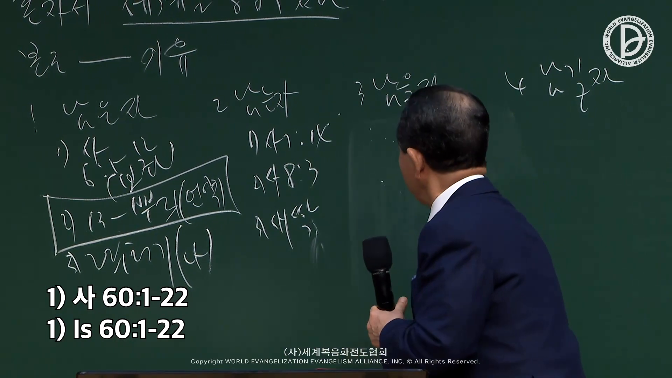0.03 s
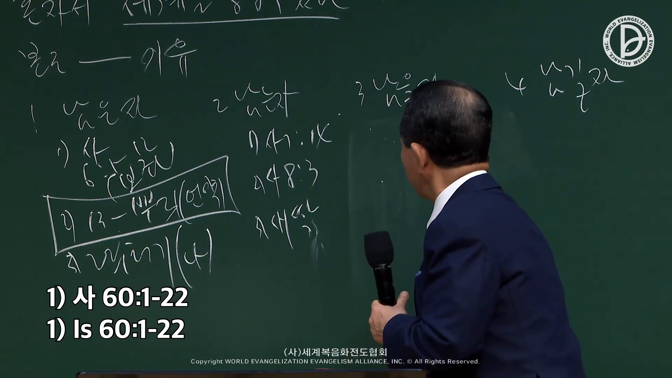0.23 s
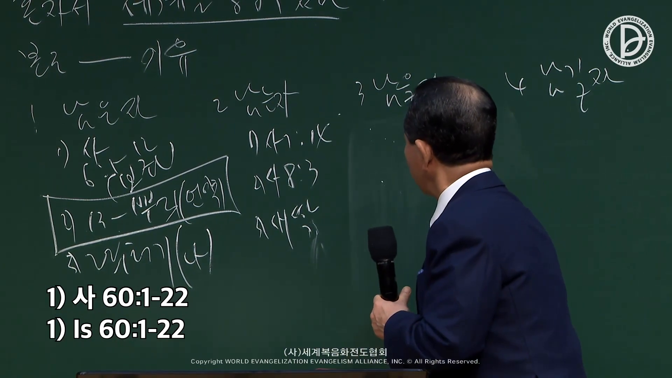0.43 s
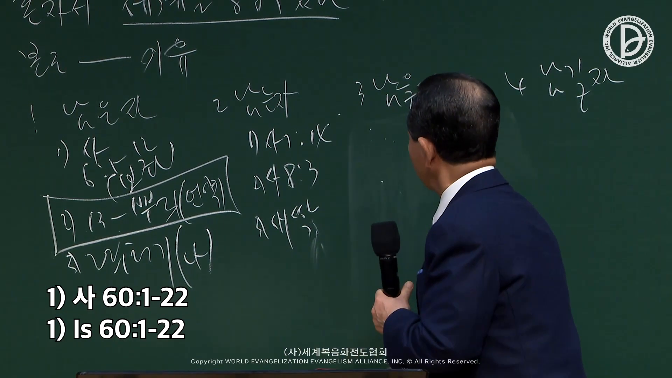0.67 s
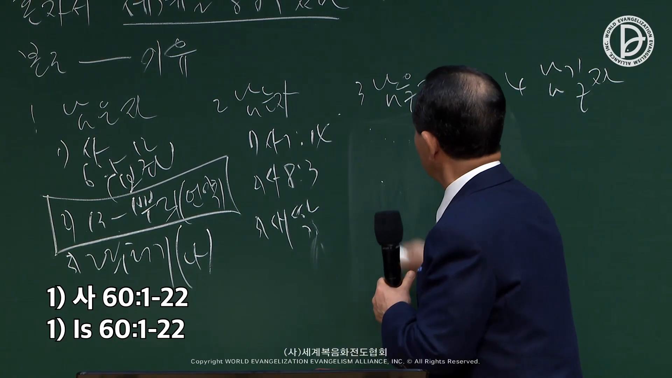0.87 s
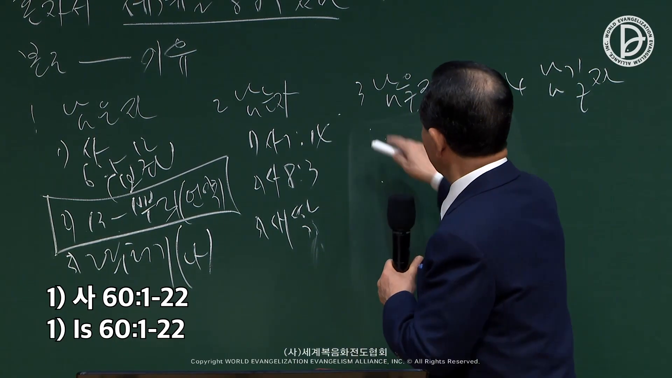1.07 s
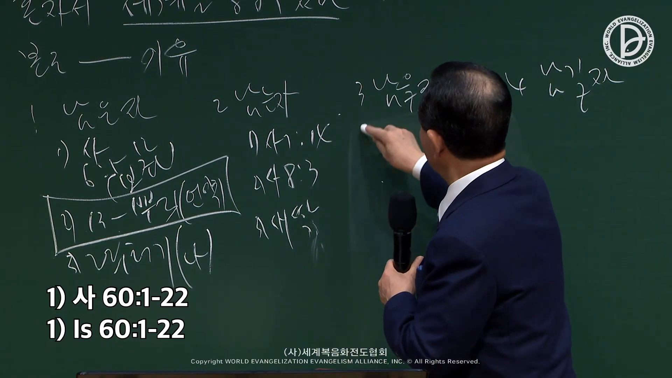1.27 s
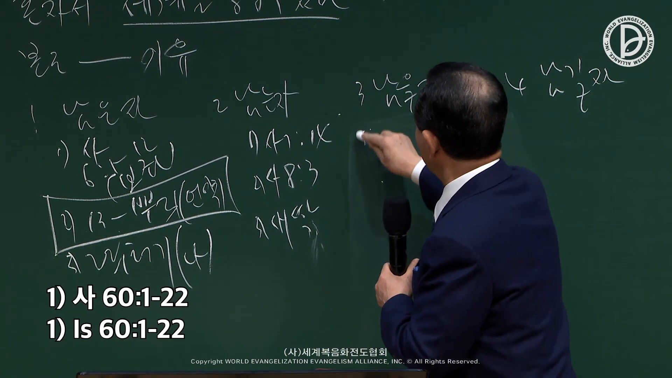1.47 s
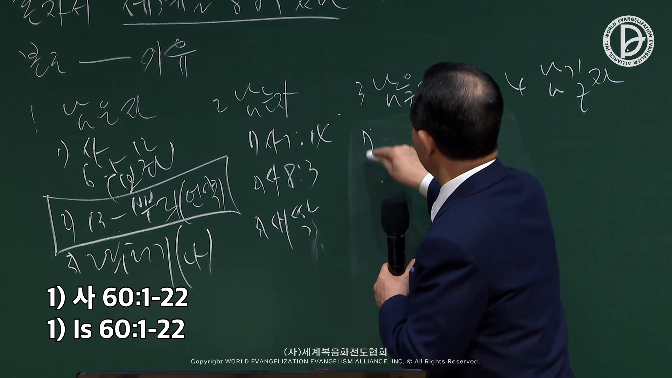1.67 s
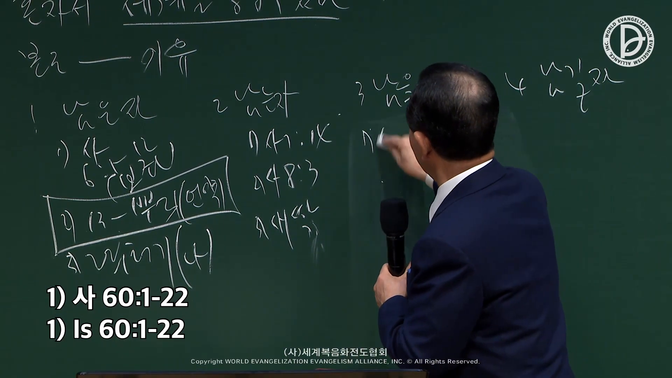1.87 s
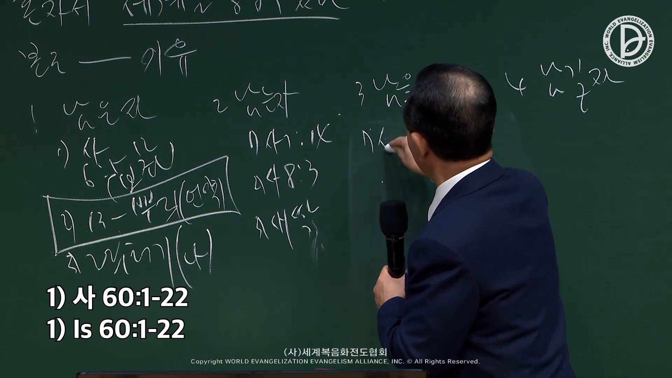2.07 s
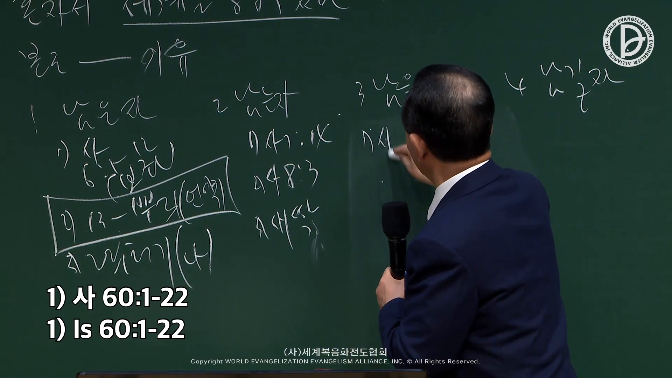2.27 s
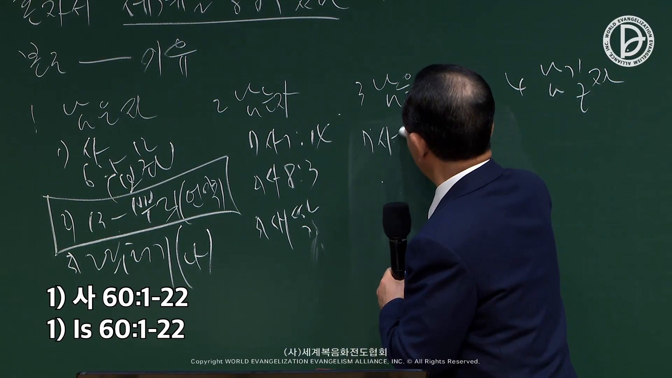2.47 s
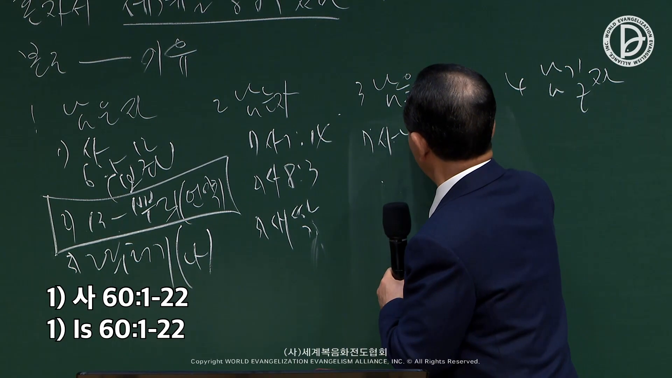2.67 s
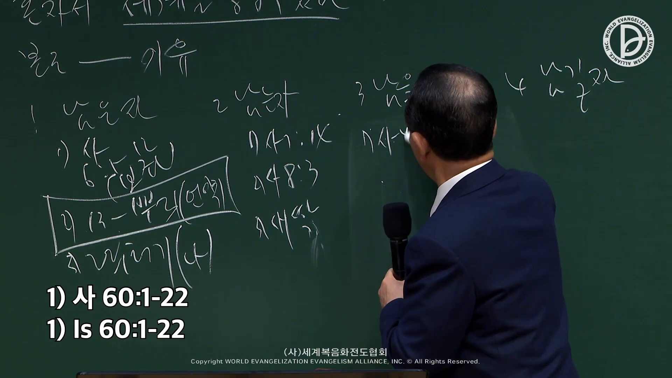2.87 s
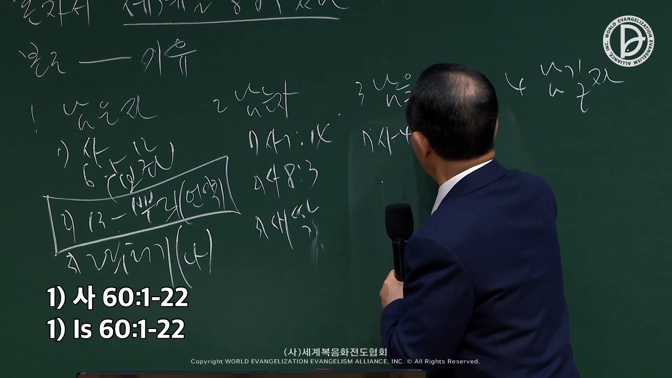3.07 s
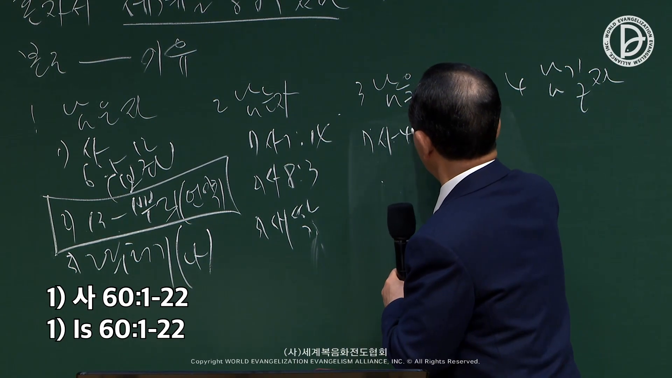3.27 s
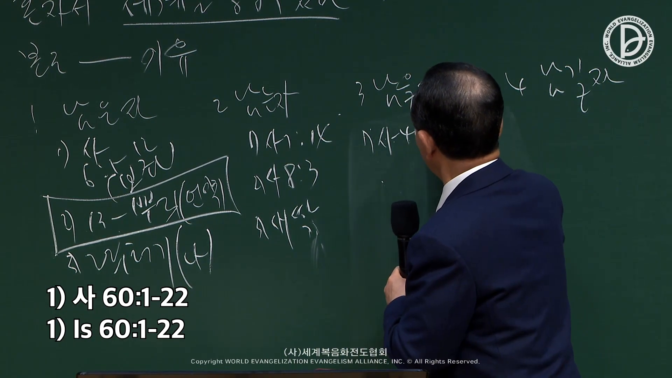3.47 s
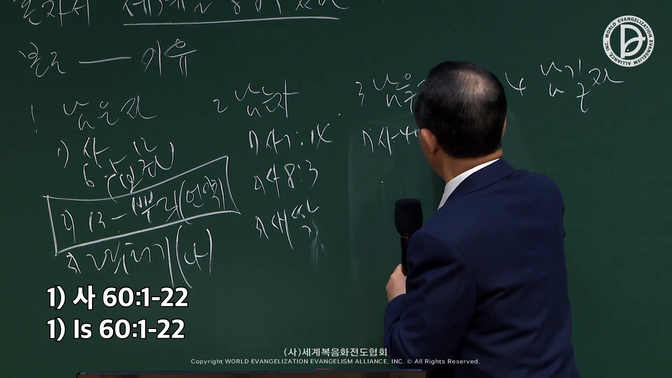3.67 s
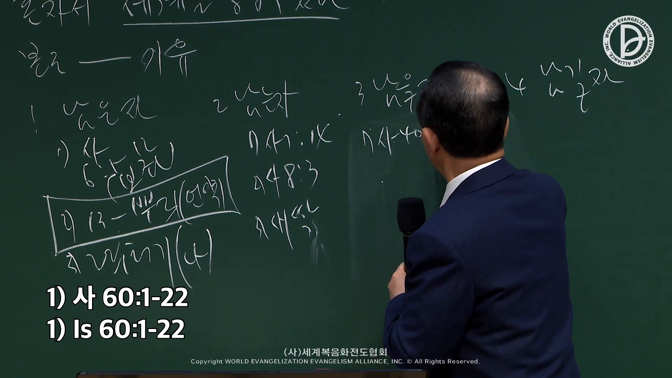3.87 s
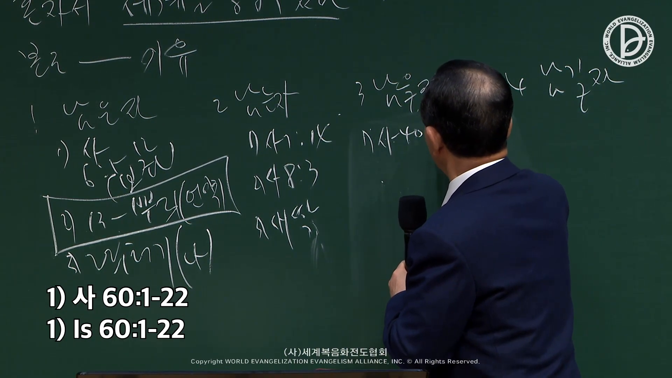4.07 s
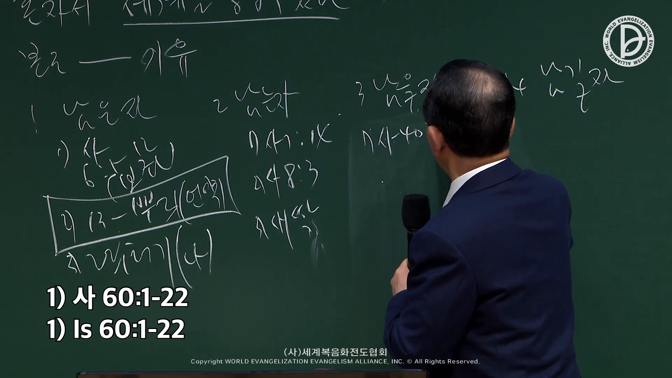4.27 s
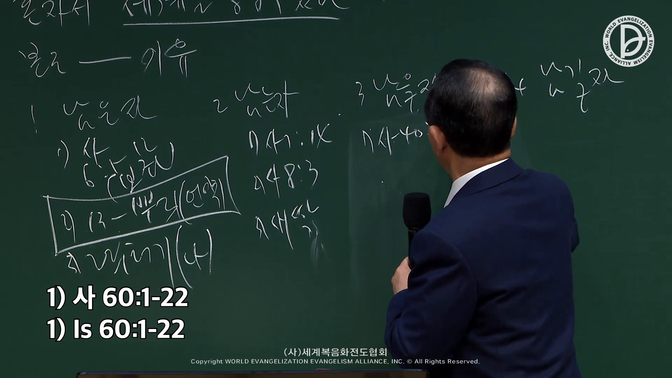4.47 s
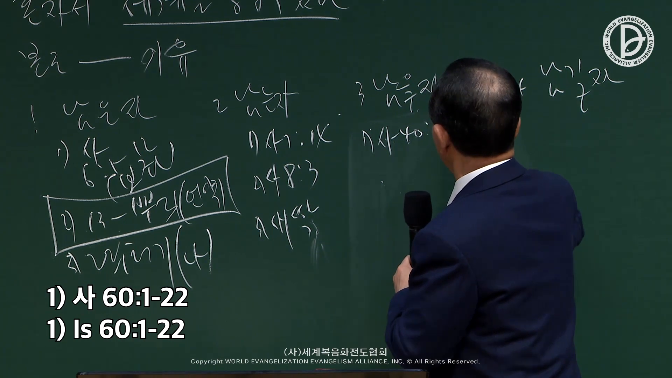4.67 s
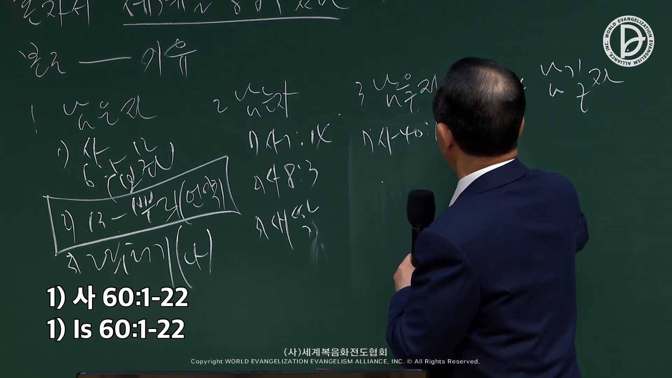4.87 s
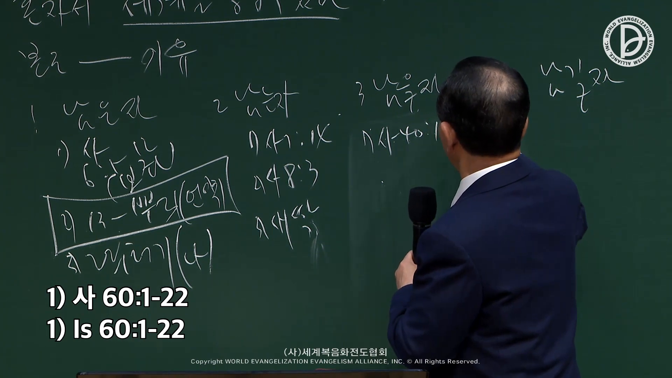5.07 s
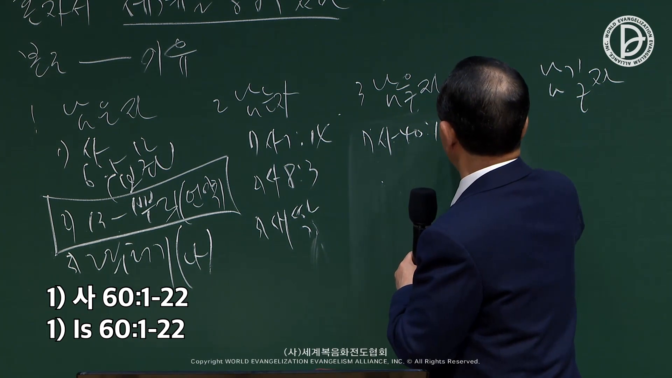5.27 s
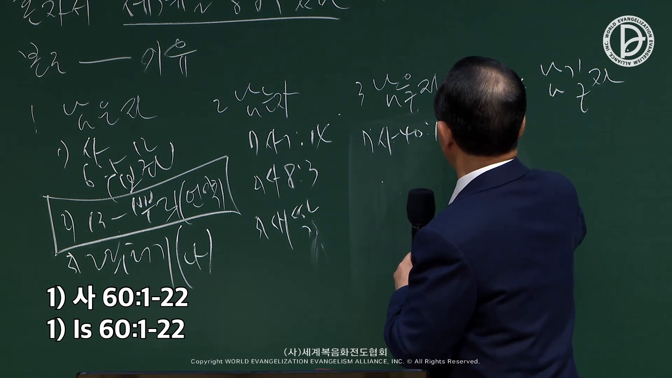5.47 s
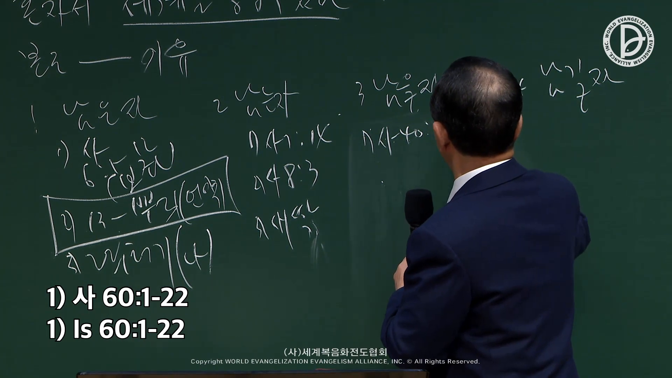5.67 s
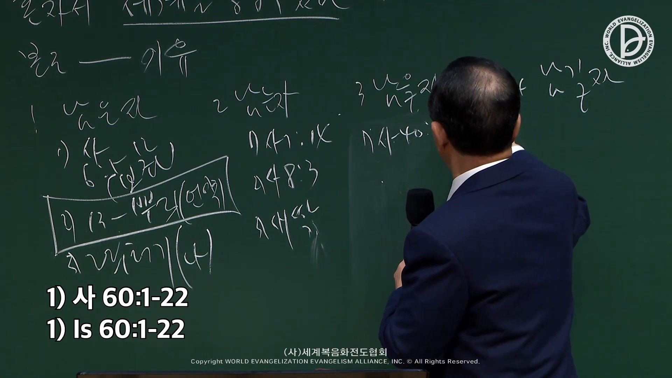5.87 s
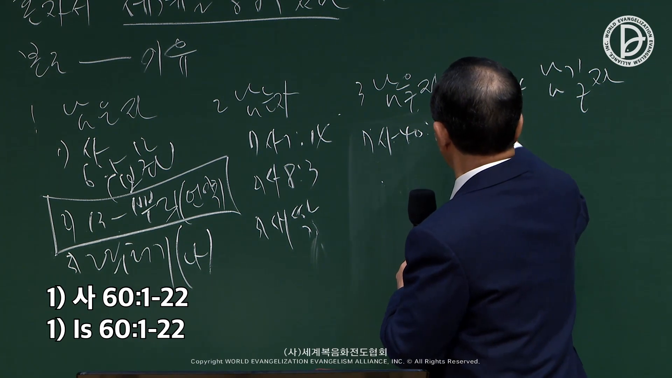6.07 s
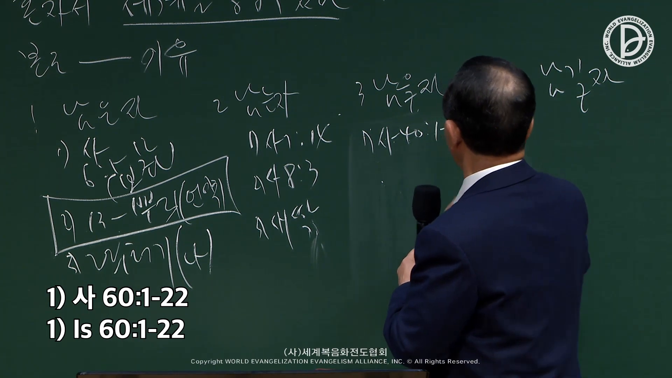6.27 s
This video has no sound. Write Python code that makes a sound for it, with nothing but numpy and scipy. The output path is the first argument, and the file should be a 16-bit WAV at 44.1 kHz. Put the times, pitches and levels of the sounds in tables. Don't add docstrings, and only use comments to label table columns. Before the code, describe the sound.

For the first 1.3 seconds there is only faint, steady ventilation and amplifier hiss, slight cloth rustle and a few very soft low knocks. At 1.3 s chalk hits the blackboard with a firm, hollow clack, and a quick uneven run follows, about every 0.2 to 0.3 s until 3.1 s, with stronger hits near 1.85, 2.85 and 3.05. Short gritty scrapes link them. Each hit is close and dry, then slaps back about 30 ms later from the hall loudspeakers with a brief bright tail. From 3.4 to 4.6 s the strikes are wider apart, duller in body, with light tip ticks and soft brushing around 3.7 to 4.05. A muffled sleeve bump comes at 4.77. Weaker taps fall at 5.3 and 5.86, with a faint fluttering chatter between from 5.6. Soft touches, low knocks and brushing close around 6.1 to 6.2 s over the hiss.

```python
import sys
import numpy as np
from scipy import signal
from scipy.fft import rfft, irfft
from scipy.io import wavfile

SR = 44100
rng = np.random.default_rng(int(sys.argv[2]) if len(sys.argv) > 2 else 0)


def store_wav(level_fs):
    pcm = np.round(np.clip(np.atleast_2d(level_fs), -1, 1) * 32767)
    wavfile.write(sys.argv[1], SR, pcm.T.astype(np.int16))


def attenuation_scalar(level_db):
    decades = np.asarray(level_db, float) / 20
    return 10 ** decades


N = 278800

# frequency in Hz, density in dB per Hz.
AIR_SPECTRUM = [(35, -67.5), (72, -6), (105, 7), (150, 1.5), (246, 0), (334, -9.5), (375, -1), (573, -7.5),
                (629, -5), (895, -5.5), (3840, -11.5), (5100, -13.5), (15400, -10.5), (16500, -18.5)]
# frequency in Hz, level in dB rms.
WHINES = [(371, -88), (3840, -87), (7531, -84), (15682, -95)]
# peak time in seconds, level in dB, swell and fade in seconds per 20 dB.
BUMPS = [(.306, -71.5, 0.45, 0.2), (.9, -85, 1.9, 5), (4.766, -48.5, 0.24, 0.15), (5.144, -73, 0.22, 0.1),
         (5.32, -56.5, 0.22, 0.03), (5.888, -64, 0.087, 0.43), (6.196, -70.5, .8, .09)]
# frequency in Hz, density in dB per Hz.
BUMP_SPECTRUM = [(53, -58), (90, -46), (157, 5), (271, 4), (416, 10), (1070, 2), (1500, -22.5), (2000, -9),
                 (2600, -52), (4400, -120)]
# start in seconds, peak in dB, frequency in Hz.
KNOCKS = [(0.144, -62, 133), (.205, -56, 553), (0.773, -70, 172), (.78, -67, 403), (0.902, -67, 124),
          (4.765, -46, 160), (4.859, -52.5, 200), (5.154, -58, 433), (6.05, -52, 442), (6.082, -59, 69),
          (6.123, -68, 69)]
# frequency in Hz, level in dB, decay time t60 in seconds.
HALL = [(100, -16, 0.4), (170, -3, 0.55), (300, -6.5, 0.96), (700, -9, 0.52), (1547, 9, 0.61),
        (2500, 9, 0.47), (4000, 6, 0.43), (7300, 13, 0.26), (12200, 9, 0.22)]
# delay in seconds, level in dB.
ECHOES = [(.0027, -19), (.0066, -20), (0.0283, -22.5), (0.032, -13), (0.0364, -27.5), (.0401, -23.5),
          (0.0406, -19.5)]
# start in seconds, board thud in dB, then knock, tick and chalk ring in dB
LANDINGS = [(1.31, -17.5, -2.5, -14.5, -28), (1.5277, -20, 3.5, -4, -18), (1.8451, -13.5, 2.1, 1, -7.5),
            (2.0177, -18, 0.6, -5, -10.5), (2.1984, -17.5, 3, -2.5, -20.5), (2.4095, -18.5, 1, -5.5, -13.5),
            (2.5801, -19.5, 2, -3.5, -18), (2.8432, -13.5, 0.7, -9.5, -13), (3.0651, -15, 2, -0.8, -12),
            (3.4107, -12, -6.5, -3, -8.5), (3.527, -24, 5, -0.5, -9), (3.681, -19, -13, -7.5, -9),
            (4.0236, -14, -12, -9, -12), (4.3541, -17, 2, 1.2, -7.5), (4.6028, -13, -9.5, -15, -19),
            (5.2917, -24, -12.5, -18, -20.5), (5.8608, -19, -20.5, -12.5, -20)]
# knock in Hz, upper knock in Hz, then upper knock
# and tip ring in dB relative to the thud.
GRIPS = [(2250, 2500, -27, -32), (2430, 3000, -8, -24), (2680, 3100, -3, -12), (2340, 3150, -1.5, -24),
         (2470, 3280, -9, -20.5), (2350, 3300, -7, -23), (2390, 3670, -17, -14.5), (2470, 3330, -11.5, -14),
         (2520, 3470, -10, -15), (2610, 3360, -10, -6.5), (2330, 3600, -14, -18), (2860, 3470, -8.5, -9.5),
         (2680, 3460, -5, -6), (2530, 3220, -5, -13.5), (2670, 3160, -13, -20.5), (2560, 3050, -15, -24),
         (2860, 3390, -11, -16)]
# frequency in Hz, level in dB, decay time t60 in seconds, sign.
PANEL_MODES = [(160, -34, 0.1, 0.59), (406, -0.23, 0.013, 0.95), (440.5, -21.5, 0.3, 0.83),
               (854, -1.5, 0.01, -1.014), (1084, -11.5, 0.01, -0.95)]
# part (1 knock, 2 upper knock, 3 tick, 4 chalk ring, 5 tip ring), share of the
# part's frequency as a ratio, level in dB, decay time t60 in seconds, sign.
CONTACT_MODES = [(1, 0.866, -0.5, 0.0074, -0.84), (1, 1.009, 6, 0.005, -0.97), (2, 0.97, 5, 0.0054, -0.95),
                 (3, 0.833, 1.5, 0.0039, -1.04), (3, 1.029, 9, 0.0034, 0.99),
                 (4, 0.827, 3.5, 0.0043, -1.64), (4, 1.004, 12, 0.0036, 0.94),
                 (5, 0.992, 6.5, 0.0042, -1.25), (5, 1.12, 2, 0.0044, 1), (5, 1.32, -5, 0.0044, -1.1)]
# time of fastest motion in seconds, level in dB, length in seconds,
# brightness in dB.
STROKES = [(1.456, -69, 0.28, 5), (1.67, -59, .2, -5.5), (2.037, -53.5, .12, 0.2), (2.227, -58.5, 0.29, 1),
           (2.664, -66, .2, 7), (3.075, -56, 0.19, 0), (3.24, -61.5, 0.26, -0.5), (3.591, -58, 0.23, 1.3),
           (3.675, -68, .05, 13), (3.93, -72, .16, 11), (4.06, -65, 0.12, 3), (4.41, -56, 0.12, 1),
           (4.604, -61.5, 0.16, 1), (4.768, -62, 0.19, -0.5), (5.17, -70, .06, -8), (5.32, -67, .15, 3),
           (5.9, -74, .6, 1.5), (6.13, -76, .1, 12), (6.19, -68, .15, -3)]
# frequency in Hz, density in dB per Hz.
SCRAPE_SPECTRUM = [(410, -25.5), (700, 4), (1210, 0), (1300, -3.5), (1480, -3), (2960, -7), (4210, -10.5),
                   (8310, -16.5), (9860, -17.5), (16000, -45)]
# start in seconds, force in dB, ring in Hz.
TOUCHES = [(3.6515, -41, 8000), (3.996, -48, 9500), (4.0497, -24, 8500), (6.081, -50, 9500),
           (6.0937, -33, 8300), (6.1105, -35, 7800), (6.243, -44, 7800)]
# time in seconds, level in dB, centre frequency in Hz.
BRUSH = [
    [(3.78, -71, 2270), (3.832, -75, 2220), (3.892, -61.5, 3610), (3.936, -60.5, 4200), (4.01, -65, 3560)],
    [(6.04, -87, 2870), (6.068, -76, 4100), (6.098, -59.5, 4200), (6.155, -58, 4000), (6.185, -61, 2260),
     (6.206, -65, 1990), (6.32, -81, 2560)],
]


def rms_one(x):
    return x / np.sqrt(np.mean(x ** 2) + 1e-20)


def at_hz(points, hz, column=1):
    points = np.array(points)
    return np.interp(np.log(hz), np.log(points[:, 0]), points[:, column])


def coloured(x, spectrum):
    hz = np.arange(N // 2 + 1) * SR / N + 1
    below, above = (spectrum[0][0] / 2, -70), (spectrum[-1][0] * 1.1, -70)
    closed = [below] + list(spectrum) + [above]
    return rms_one(irfft(rfft(x) * attenuation_scalar(at_hz(closed, hz)), N))


def drift(rate_hz):
    r = np.exp(-2 * np.pi * rate_hz / SR)
    settled = signal.lfilter([1], [1, -2 * r, r * r], rng.standard_normal(N + SR))[SR:]
    return rms_one(settled)


def band_pass(x, low_hz, high_hz):
    return signal.sosfilt(signal.butter(2, [low_hz, high_hz], "band", fs=SR, output="sos"), x)


def add_mode(out, s, db, hz, t60, rise_s, sign):
    first = int(s * SR)
    t = np.arange(min(int(1.5 * t60 * SR), N - first)) / SR
    swell = 1 - np.exp(-t / max(rise_s, 1e-5))
    out[first:first + len(t)] += sign * attenuation_scalar(db - 60 * t / t60) * swell * np.sin(2 * np.pi * hz * t)


def air():
    t = np.arange(N) / SR
    whines = sum(attenuation_scalar(db + 4.5) * np.sin(2 * np.pi * hz * t) for hz, db in WHINES)
    return attenuation_scalar(-69) * coloured(rng.standard_normal(N), AIR_SPECTRUM) + whines


def bumps():
    t = np.arange(N) / SR
    moves = 0
    for s, db, swell_s, fade_s in BUMPS:
        moves = moves + attenuation_scalar(db - 20 * np.maximum((s - t) / swell_s, (t - s) / fade_s))
    return moves * attenuation_scalar(2 * drift(10)) * coloured(rng.standard_normal(N), BUMP_SPECTRUM)


def knocks():
    out = np.zeros(N)
    for s, db, hz in KNOCKS:
        for ratio, part_db in [(0.97, 7.5), (1.47, -2.0), (0.41, -24.0)]:
            add_mode(out, s, db + part_db, hz * ratio, 9.0 / hz + .02, .003, 1)
    return out


def hall(x):
    speaker_delay_s = .029
    t = np.arange(SR) / SR
    late = np.maximum(t - speaker_delay_s, 0)
    near = attenuation_scalar(4 - 60 * t / .15) * (t > .003) * (t < .045)
    edges = 90 * 2 ** np.arange(0, 7.6, .5)
    white = rng.standard_normal((2, SR))
    tail = 0
    for k, (low, high) in enumerate(zip(edges, edges[1:])):
        hz = np.sqrt(low * high)
        t60 = at_hz(HALL, hz, column=2)
        plateau = attenuation_scalar(-60 * (late / t60) ** 1.377)
        early = attenuation_scalar(-12.0 - 60 * late / 0.12)
        far = (plateau + early) * np.clip(late / 0.0035, 0, 1)
        tail = tail + attenuation_scalar(at_hz(HALL, hz) - 43.5) * (near + far) * band_pass(white[k % 2], low, high)
    echoes = np.zeros(SR)
    for delay_s, db in ECHOES:
        echoes[int(delay_s * SR)] = -attenuation_scalar(db)
    echoes = band_pass(attenuation_scalar(3) * echoes, 900, 12000)
    return signal.fftconvolve(x, tail + echoes)[:N]


def landings(far, shifts):
    contact_hz, pitch_spread = np.array((5860, 8760, 11200)), .02
    decay_share = .3 if far else 1
    out = np.zeros(N)
    for landing, grip, shift in zip(LANDINGS, GRIPS, shifts):
        s, thud_db, knock_db, tick_db, ring_db = landing
        knock_hz, upper_hz, upper_db, tip_db = grip
        for hz, db, t60, sign in PANEL_MODES:
            overtone_db = (sign < 0) * (1.93 + 0.32 * knock_db)
            add_mode(out, s + .00005, thud_db + db + overtone_db, hz, t60, .00015, sign)
        part_db = knock_db, upper_db, tick_db, ring_db, tip_db - 3 * far
        part_hz = [knock_hz, upper_hz, *contact_hz * (1 + pitch_spread * shift[2:])]
        for part, share, db, t60, sign in CONTACT_MODES:
            k = int(part) - 1
            rise_s = .0002 if k < 2 else .0005
            mode_db, mode_hz = thud_db + part_db[k] + db, part_hz[k] * share
            add_mode(out, s - .00006, mode_db, mode_hz, t60 * decay_share, rise_s, sign)
    return out


def scrape():
    grains_per_s, edge_db = 9000, 8.5
    born = rng.random(N) < grains_per_s * attenuation_scalar(2 * drift(40)) / SR
    grains = born * attenuation_scalar(2.5 * rng.exponential(1, N)) * rng.choice([-1, 1], N)
    grit = coloured(grains, SCRAPE_SPECTRUM)
    dull = signal.sosfilt(signal.butter(2, 3000, fs=SR, output="sos"), grit)
    t, low, high = np.arange(N) / SR, 0, 0
    for s, db, length_s, tilt_db in STROKES:
        speed = attenuation_scalar(db - edge_db * np.abs(2 * (t - s) / length_s) ** 1.3)
        low = low + speed * attenuation_scalar(-tilt_db)
        high = high + speed * attenuation_scalar(tilt_db)
    return attenuation_scalar(-2.5 + 1.0 * drift(23)) * (dull * low + (grit - dull) * high)


def touches():
    out = np.zeros(N)
    for s, db, hz in TOUCHES:
        for ratio, part_db in [(.38, -6), (.62, -6), (.82, -3), (1, -1), (1.2, -3), (1.4, -5)]:
            add_mode(out, s, db + part_db, hz * ratio, .0025, .0003, 1)
    return out


def brush():
    rows = []
    for spell in BRUSH:
        first, last = spell[0], spell[-1]
        rows += [(first[0] - .03, -110, first[2]), *spell, (last[0] + .02, -110, last[2])]
    s, db, hz = np.transpose(rows)
    t = np.arange(N) / SR
    level_db, centre_hz = np.interp(t, s, db), np.interp(t, s, hz)
    out, edges = 0, 700 * 2 ** np.arange(0, 4.4, .4)
    for low, high in zip(edges, edges[1:]):
        band = rms_one(band_pass(rng.standard_normal(N), low, high))
        octaves_off = np.abs(np.log2(np.sqrt(low * high) / centre_hz))
        out = out + band * attenuation_scalar(-16 * octaves_off + 2.5 * drift(30))
    return attenuation_scalar(level_db - 3.0) * out


def chatter():
    start_s, bounces_per_s, jitter = 5.602, 31.5, .12
    first_db, fade_db_per_s, spread_db = -65, 9, 1.5
    puffs, t = np.zeros(N), np.arange(N) / SR
    for k, (late, strong) in enumerate(rng.standard_normal((8, 2))):
        after_s = (k + jitter * late) / bounces_per_s
        db = first_db - fade_db_per_s * after_s + spread_db * strong
        puffs += attenuation_scalar(db - 5) * np.exp(-((t - start_s - after_s) / 0.012) ** 2)
    resonances = [(4550, -19), (4950, 3.0), (5400, -5), (5850, 1), (6250, -25)]   # Hz, dB per Hz
    return puffs * coloured(rng.standard_normal(N), resonances)


def scene():
    ticks, small = touches(), scrape() + knocks()
    shifts = rng.standard_normal((len(LANDINGS), 5))
    back = hall(landings(1, shifts) + small + attenuation_scalar(-3.5) * ticks)
    board = landings(0, shifts) + ticks + small
    return (board + back + chatter() + brush() + bumps() + air())[None]


def band_limit(x):
    return signal.sosfilt(signal.butter(12, 16830, fs=SR, output="sos"), x)


def record(dry):
    peak_limit, shift_hz = .75, 11500
    close = signal.sosfilt(signal.butter(6, 138, "high", fs=SR, output="sos"), dry)
    close = close + attenuation_scalar(-8) * signal.sosfilt(signal.butter(2, 55, fs=SR, output="sos"), dry)
    close = peak_limit * np.tanh(close / peak_limit)
    lifted = close * np.cos(2 * np.pi * shift_hz * np.arange(N) / SR)
    top_band = signal.butter(6, [12300, 15800], "band", fs=SR, output="sos")
    close = close + attenuation_scalar(-24) * signal.sosfilt(top_band, lifted)
    close = close - .0021 + attenuation_scalar(-100) * drift(54)
    mix = signal.sosfilt(signal.cheby2(10, 60, 16900, fs=SR, output="sos"), close)
    return band_limit(mix)


dry = scene()
out = record(dry)
store_wav(out)
```